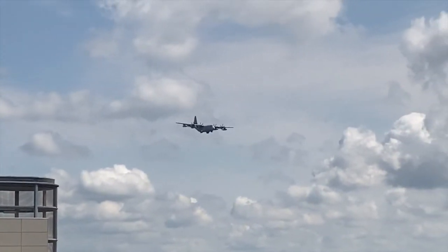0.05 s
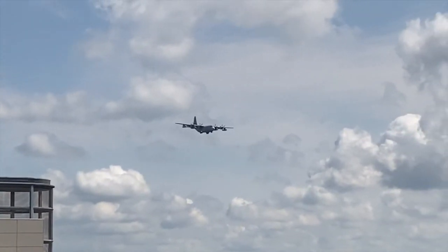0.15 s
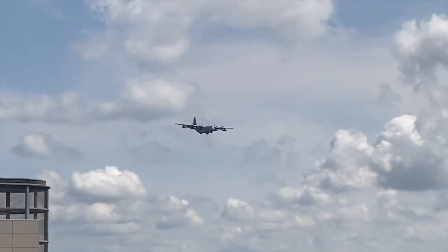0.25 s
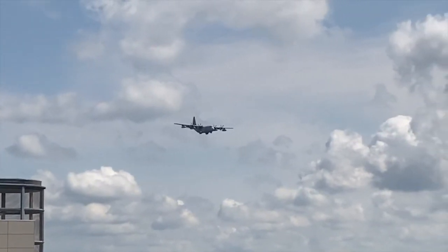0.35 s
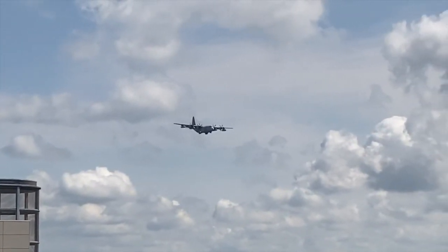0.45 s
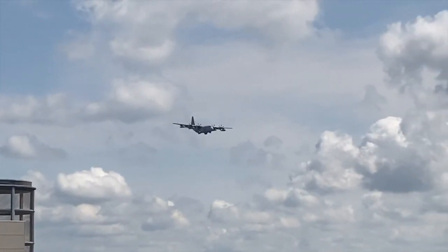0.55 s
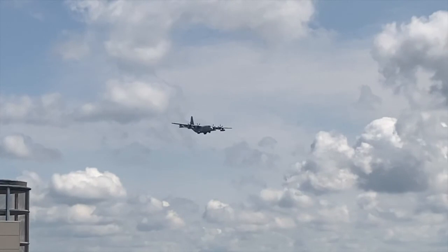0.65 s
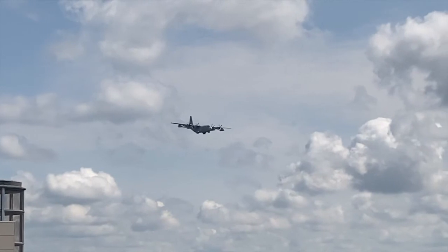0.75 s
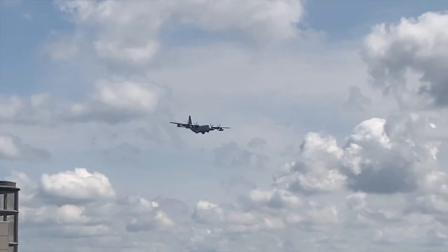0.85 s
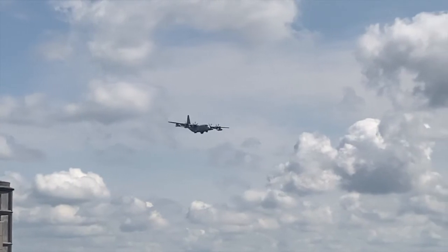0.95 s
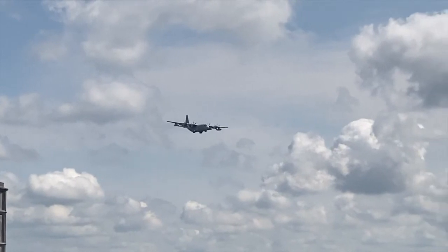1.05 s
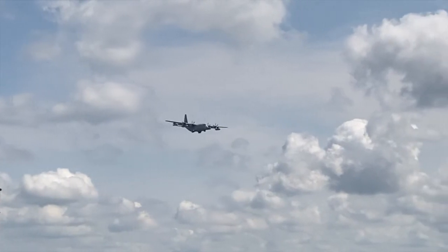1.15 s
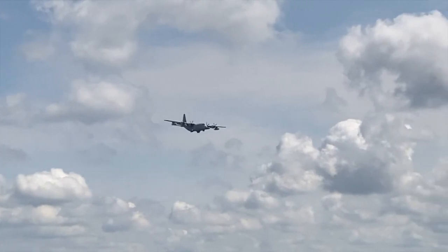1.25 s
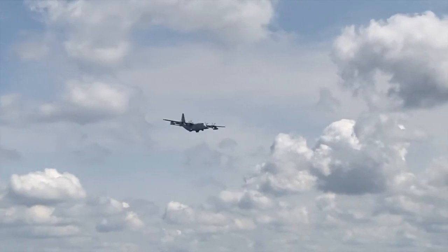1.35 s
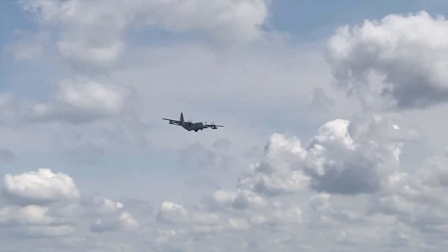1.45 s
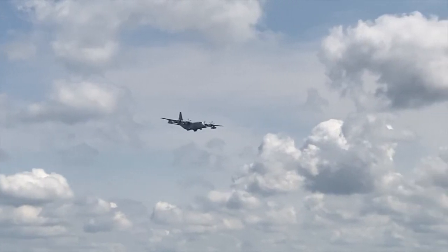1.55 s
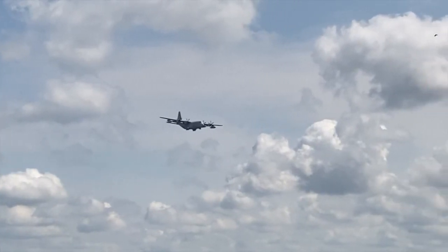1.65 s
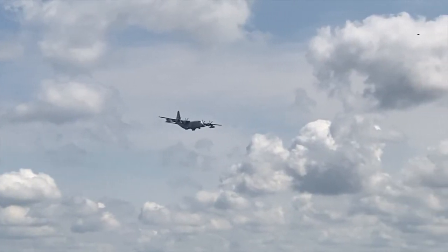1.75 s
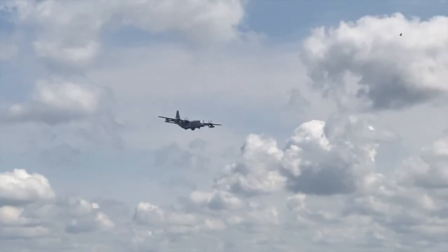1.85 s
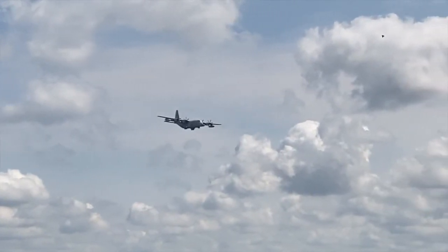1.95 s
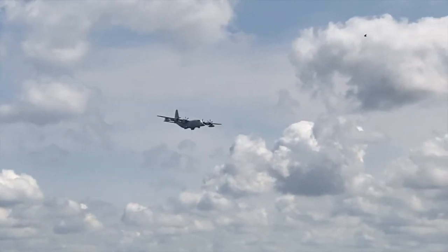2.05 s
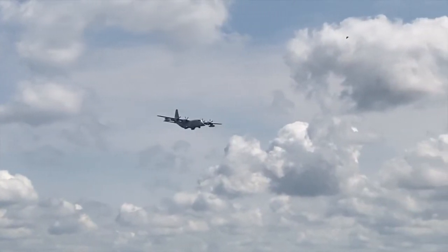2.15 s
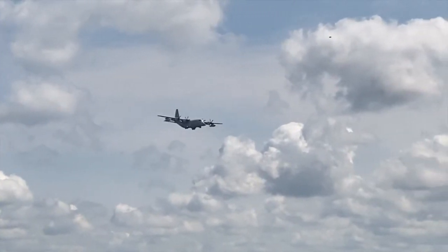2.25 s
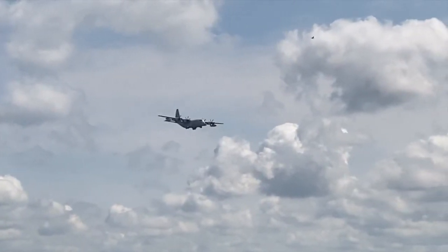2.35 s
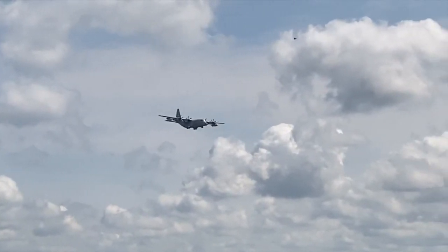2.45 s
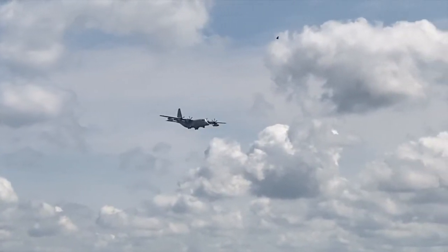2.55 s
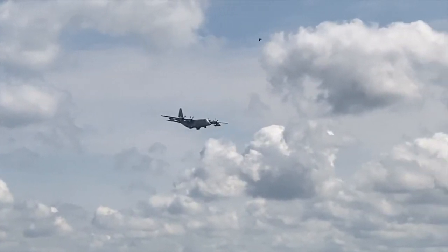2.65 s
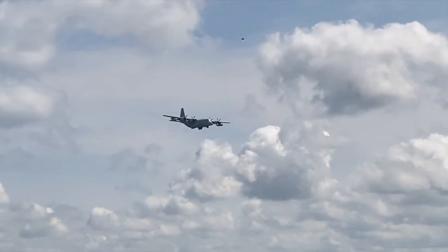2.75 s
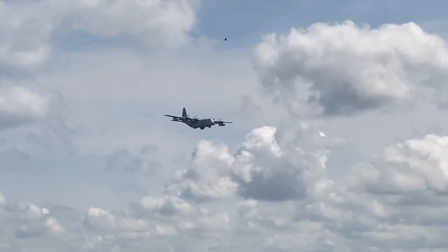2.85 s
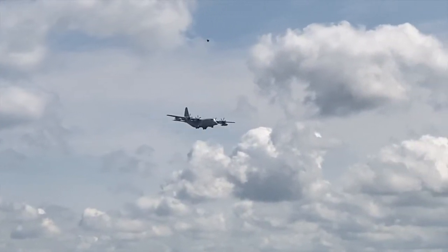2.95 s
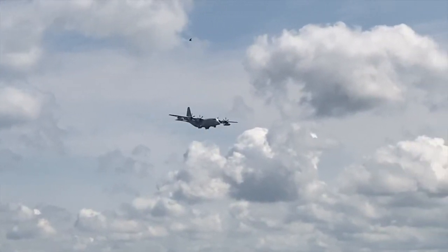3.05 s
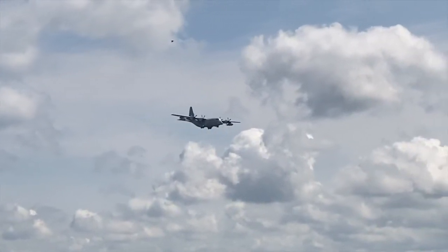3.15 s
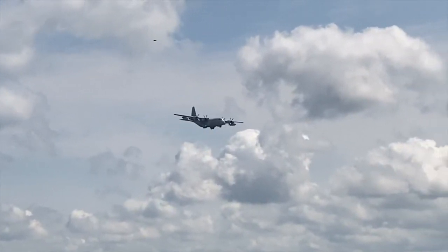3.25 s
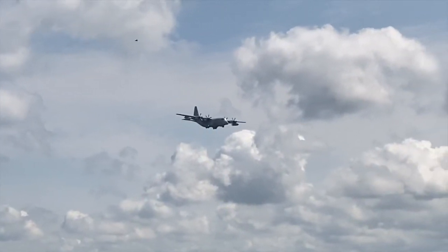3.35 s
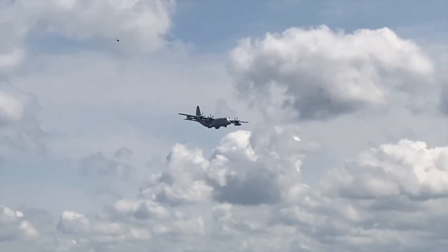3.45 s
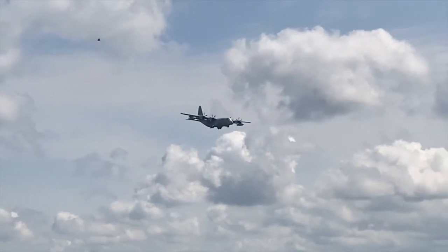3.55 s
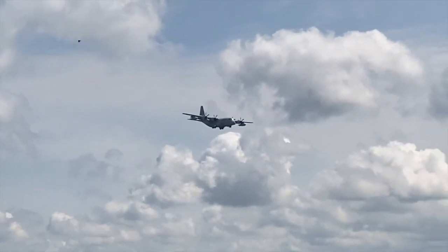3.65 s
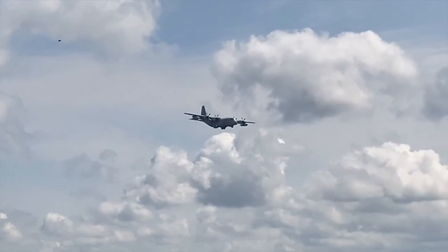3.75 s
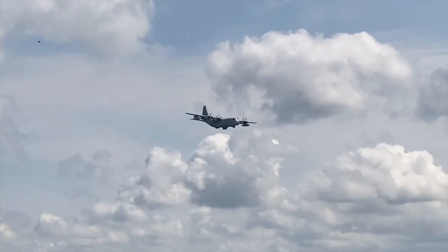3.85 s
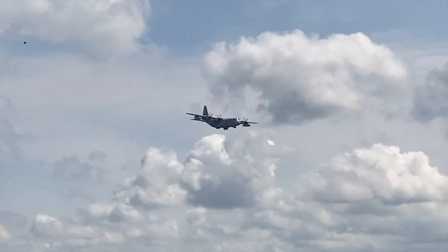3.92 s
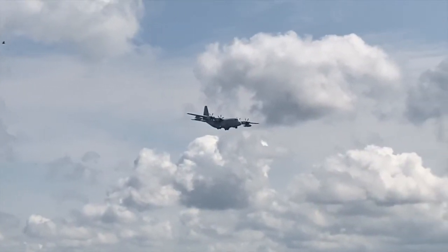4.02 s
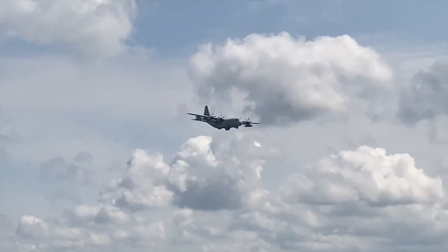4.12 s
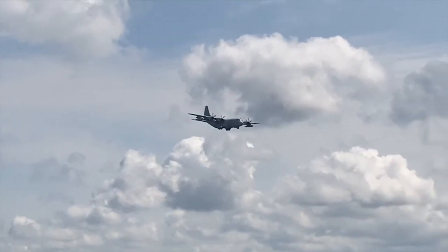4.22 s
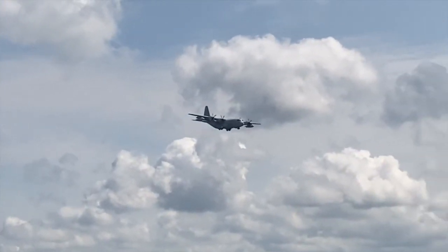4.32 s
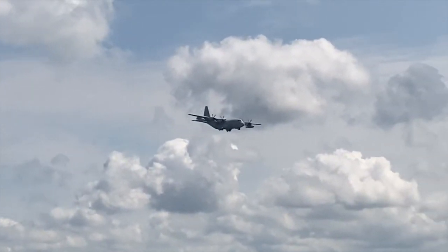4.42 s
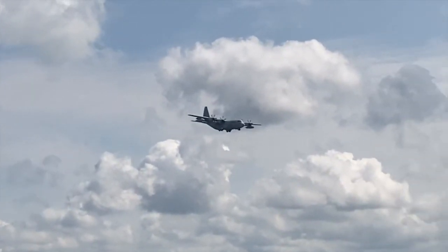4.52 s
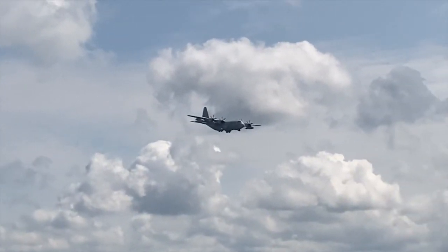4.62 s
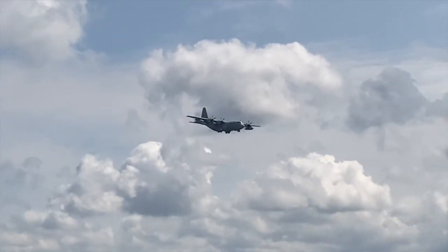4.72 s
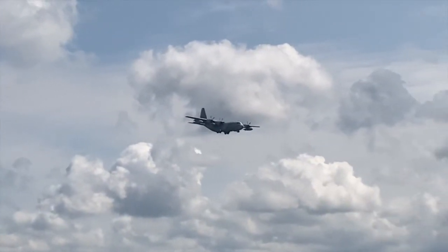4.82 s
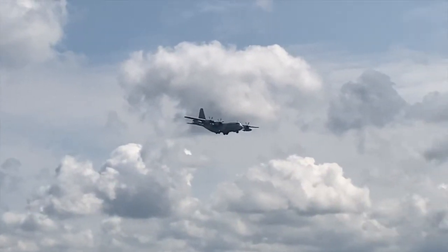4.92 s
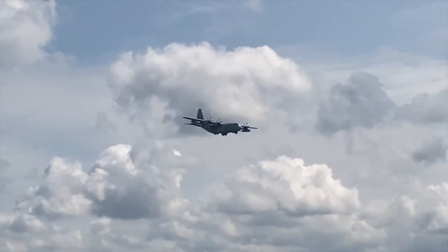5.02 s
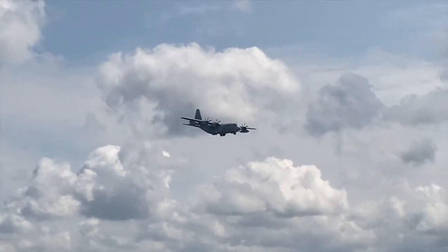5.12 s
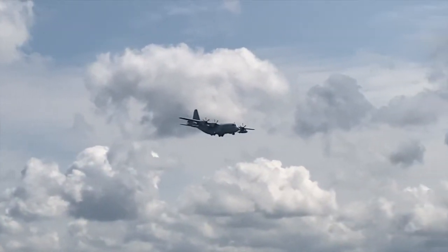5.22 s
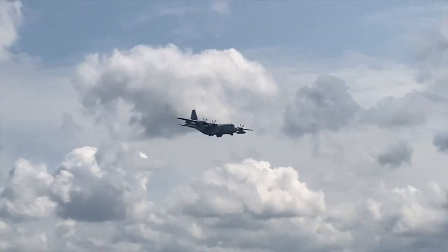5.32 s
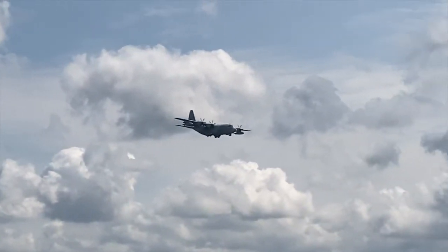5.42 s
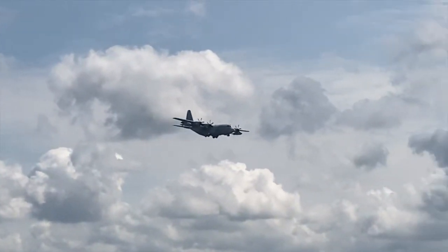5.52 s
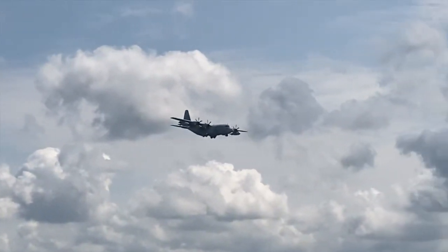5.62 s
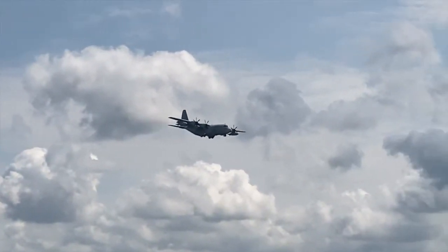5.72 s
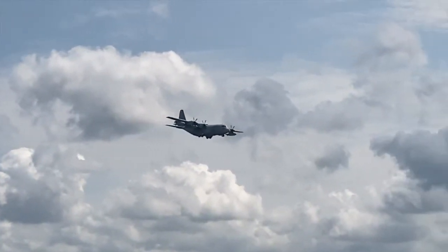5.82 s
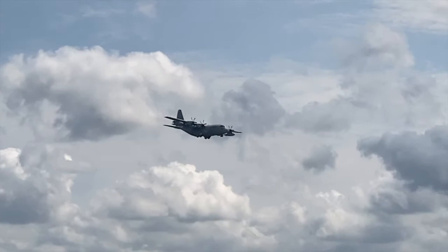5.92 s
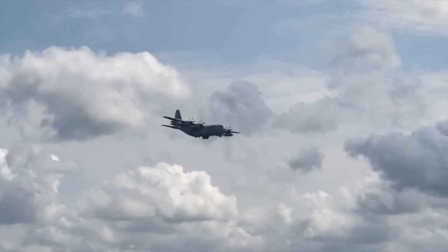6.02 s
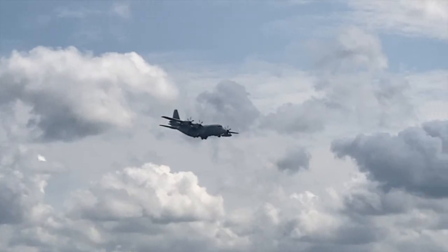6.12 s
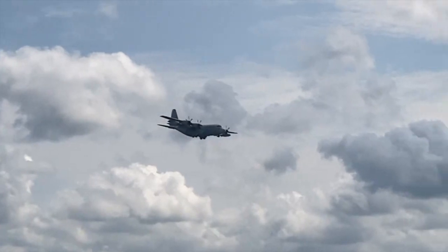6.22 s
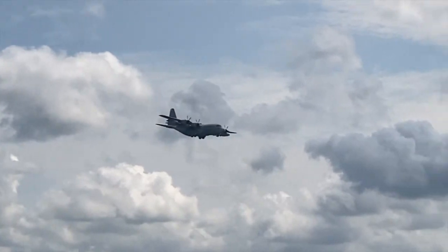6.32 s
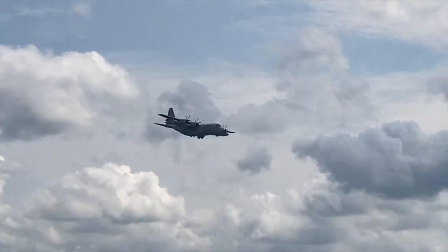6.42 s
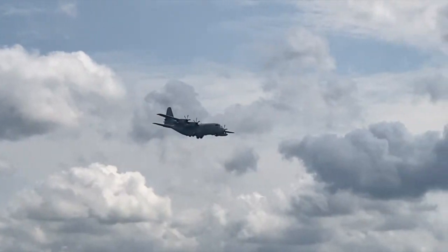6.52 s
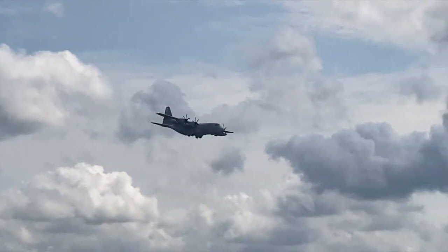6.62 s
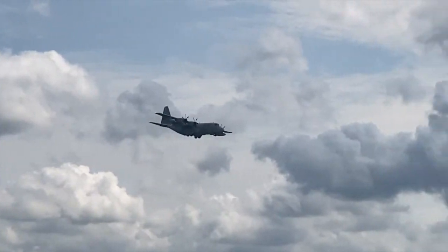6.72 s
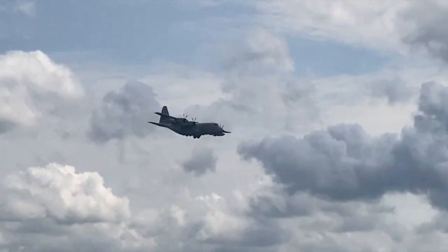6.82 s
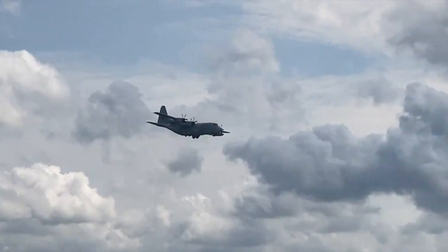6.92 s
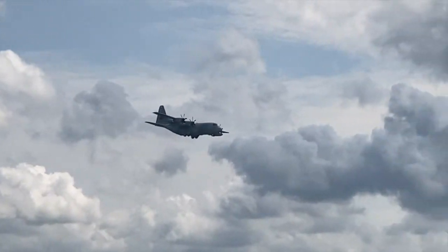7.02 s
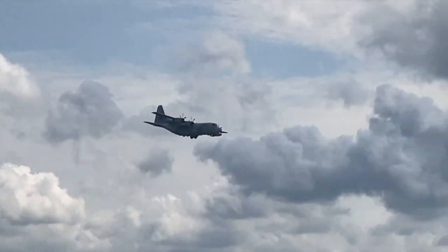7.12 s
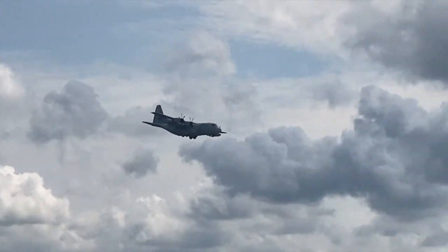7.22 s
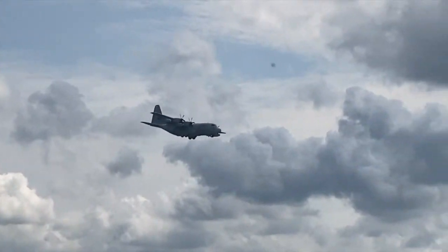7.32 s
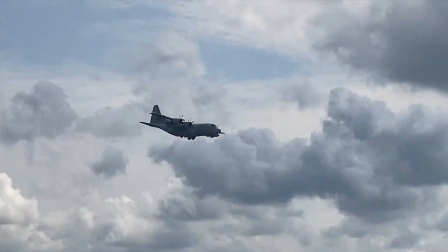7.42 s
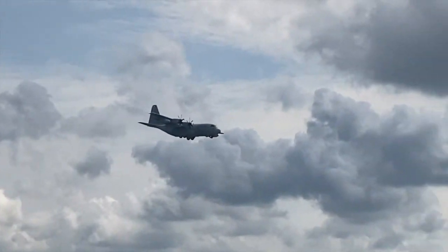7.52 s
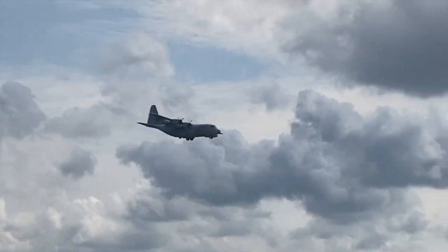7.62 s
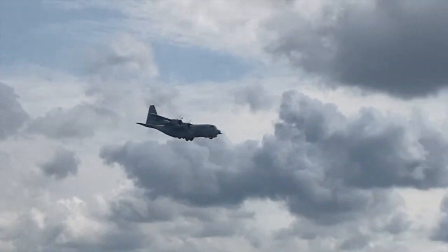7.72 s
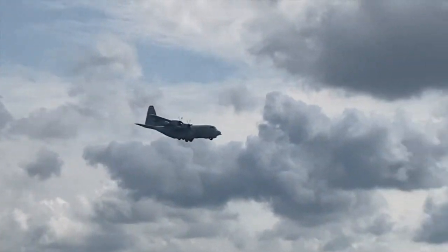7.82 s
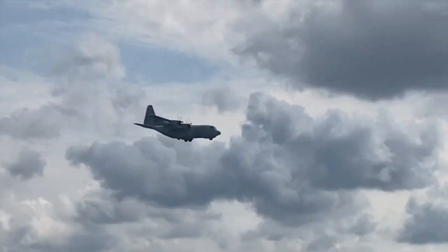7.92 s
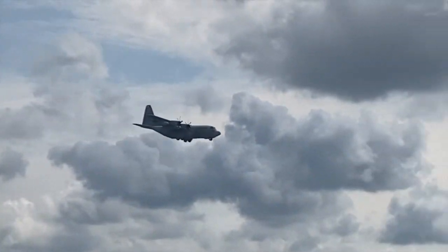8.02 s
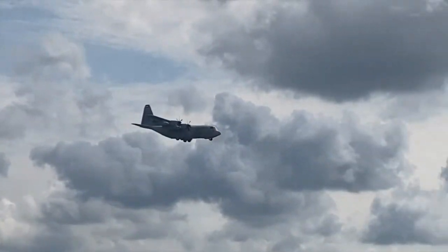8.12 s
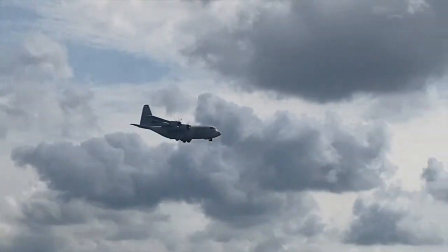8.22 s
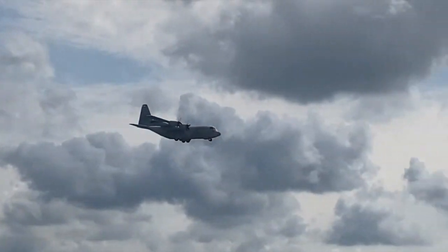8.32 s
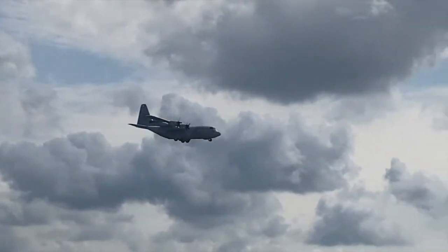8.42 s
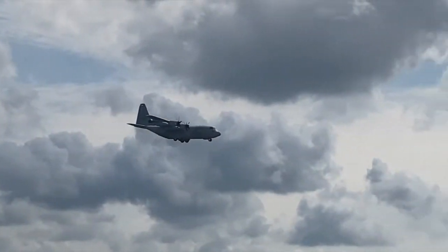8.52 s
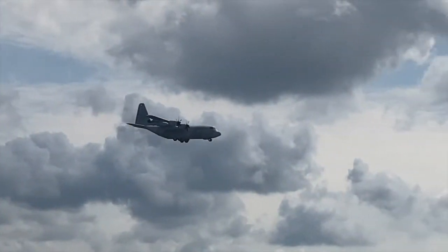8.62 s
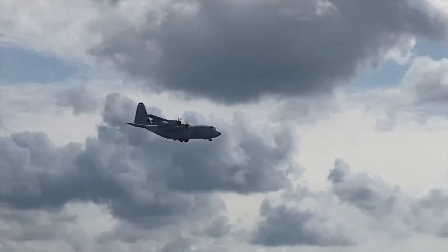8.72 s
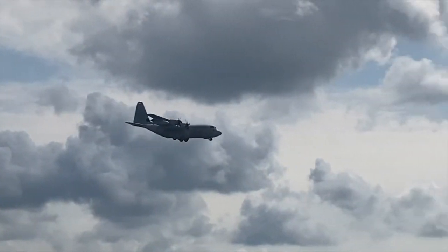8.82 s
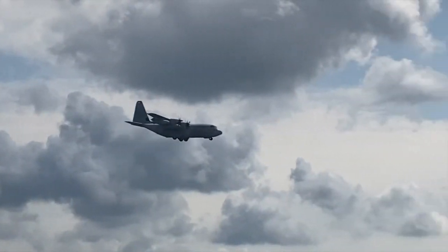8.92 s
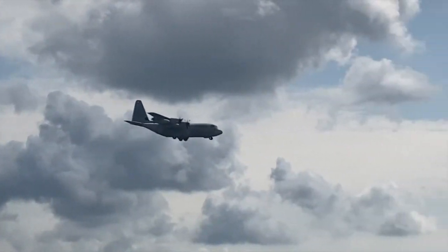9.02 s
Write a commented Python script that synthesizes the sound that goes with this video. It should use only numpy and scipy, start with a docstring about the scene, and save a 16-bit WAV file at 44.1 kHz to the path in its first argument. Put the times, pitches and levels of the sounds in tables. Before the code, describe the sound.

Wavering low-pitched roar of a heavy turboprop flying nearer, with faint high turbine whine, then a strong throbbing blade hum emerging over the rumble.

```python
"""A four-engine turboprop comes in low over open ground, heard at two close microphone ports.
From the start its roar, noise shaped by pitch, swells in gusty air, combed by a nearby surface, while
narrow noise makes a high compressor whine and its whistles; a low hum of narrow noise lies below.
Later the blade tone, a few sines with growling noise, rises out of the roar and sinks in pitch.
Faint hiss and a faint mirror of the sound in the treble lie over it all."""
import sys
import numpy as np
from scipy import signal
from scipy.fft import rfft, irfft, next_fast_len
from scipy.io import wavfile
from scipy.ndimage import uniform_filter1d, map_coordinates

SR = 44100
rng = np.random.default_rng(int(sys.argv[2]) if len(sys.argv) > 2 else 0)


def voltage_ratio(decibels):
    """Convert decibels (scalar or array-like) to amplitude ratios, 20 dB per decade."""
    exponent = np.asarray(decibels, float) / 20
    return 10 ** exponent


def transcribe(signal):
    """Save signal, clipped to [-1, 1], as a 16-bit WAV file at the path in sys.argv[1]."""
    frames = np.atleast_2d(signal).T
    limited = np.clip(frames, -1, 1)
    pcm = np.round(limited * 32767).astype(np.int16)
    wavfile.write(sys.argv[1], SR, pcm)


N = 399546   # length in samples

# middle of the compressor whine: (time [s], pitch [Hz])
WHINE_PITCH = [(0, 6780), (3, 6660), (5.5, 6520), (6.6, 6580), (7.4, 6730), (8.2, 6680), (9.06, 6640)]
# whine as the intakes turn, at mean distance and swell:
# (time [s], level of the shared part [dB], width [Hz], left over right [dB])
WHINE_SHAPE = [(0, -81, 260, -3), (1.5, -71, 260, 5), (3, -70.5, 280, 0), (4.5, -69, 300, 1),
               (6, -71, 320, 3.5), (6.9, -71, 350, 7), (7.5, -69.5, 480, 4.5), (8.1, -68, 520, 5.5),
               (8.3, -73.5, 520, 6), (8.5, -70, 560, 3), (8.8, -75, 520, 9), (9.06, -76, 500, 7)]
# whistles of single compressors: (start [s], end [s], start pitch [Hz], end pitch [Hz], level over whine [dB])
WHISTLES = [(0, 6.1, 6790, 6500, -3), (1.7, 4.2, 6330, 6230, -8), (6.1, 6.9, 6630, 6660, -5),
            (6.0, 6.9, 6510, 6540, -5), (7.35, 8.3, 6760, 6660, -4), (7.4, 8.6, 6280, 6170, -9),
            (7.9, 8.2, 5990, 5950, -6), (8.6, 9.06, 6600, 6520, -5), (.9, 3.3, 4940, 4930, 2)]
# wavering low hum: (time [s], pitch [Hz], level [dB])
HUM = [(2.5, 94, -50), (3.3, 94, -43), (4.3, 93, -44), (5.7, 92, -41), (7, 92, -42), (8, 90, -48),
       (9.06, 88, -54)]
# blade tone, growing as the propeller discs turn edge-on: (time [s], level [dB])
BLADE_TONE = [(3.6, -60), (4.2, -43), (4.6, -39), (5.1, -41), (5.25, -33), (5.55, -33), (5.65, -40),
              (5.85, -33), (6.05, -43), (6.3, -36), (6.6, -44), (6.66, -29), (6.9, -27), (6.95, -45),
              (7.0, -28), (7.1, -31), (7.2, -26.5), (7.56, -21), (7.86, -24), (8.34, -18), (8.42, -19.5),
              (8.5, -17), (8.66, -20), (8.8, -19.5), (9.06, -23)]
# its overtones: (time [s], second multiple [dB], third multiple [dB])
OVERTONES = [(6.5, -55, -60), (7.35, -46, -52), (7.45, -33, -46), (7.7, -33, -45), (7.85, -36, -46),
             (8.0, -34, -45), (8.3, -33, -43), (8.45, -36, -42), (8.65, -40, -43), (8.8, -32, -43),
             (9.06, -32, -46)]
# colour given to the roar, without its comb and cut off above about 8.3 kHz; only the shape counts:
# (pitch [Hz], level [dB per Hz])
ROAR_COLOUR = [(20, -33.5), (35, -15.5), (55, -1.5), (100, -1.5), (230, 1.5), (410, -6), (520, -12.5),
               (720, -9), (1100, -14.5), (1450, -14.5), (1900, -17.5), (2450, -16), (2800, -16),
               (3300, -23), (4500, -36.5), (5600, -43), (6200, -43), (6900, -64), (7200, -70.5),
               (8250, -80), (8500, -100)]
# how far the left port leads, aircraft far and ahead, then near and aside: (pitch [Hz], lead [radians])
LEAD_FAR = [(0, 0), (1400, .1), (2100, .8), (2600, 1.7), (3400, 2.4), (4200, 2.7), (4700, 1.4), (6200, 2.4),
            (6900, 0), (7600, 0), (8400, -2.8)]
LEAD_NEAR = [(0, 0), (800, .3), (1400, .2), (2100, 1.4), (2400, 2.1), (2900, 3.1), (3300, 3), (6200, 3),
             (6700, 0), (7500, -.8), (8400, -2.8)]
# the bearing swings between these times: (start [s], end [s])
BEARING_SWING_S = (5.5, 7.6)
# scattered sound, unrelated at the two ports, against the direct roar:
# (pitch [Hz], level when far [dB], level when near [dB])
SCATTER = [(30, -10, -8.5), (200, -19, -25), (624, -6.5, -6.5), (2500, -6, -8), (3330, -6.5, -5),
           (3990, 2, 0.5), (4620, 3, -3), (5200, -2, -5.5), (6100, -2.5, -4.5), (7000, -8.5, -8),
           (8000, -1.5, -4)]
# balance of the roar: (pitch [Hz], left over right [dB])
BALANCE = [(60, -.3), (400, .6), (820, -.4), (1200, .8), (2500, -1.5), (3300, 0), (4500, 2.6), (7000, 1)]
# reflection off a nearby surface: (time [s], delay [ms], level [dB])
ECHO = [(0, 1.235, -7), (3, 1.235, -7), (5, 1.245, -7.5), (6.5, 1.25, -8), (7.4, 1.30, -7),
        (9.06, 1.30, -7)]
# faint later paths off ground and buildings: (delay [ms], level [dB])
LATER_PATHS = [(2.6, -18), (3.7, -19), (5.1, -19), (6.4, -19), (8.2, -19), (10.1, -20), (12.6, -20),
               (17.3, -21)]
# gusty air lets the roar through in swells, counted from the mean level:
# (time [s], level [dB], tilt toward the treble [dB per octave])
SWELL = [(0, -38, -1.5), (.3, -37.5, 3.5), (.7, -40.5, 2), (1.2, -42, 0), (1.55, -40.5, 0.8), (1.9, -44, 2),
         (2.3, -41.5, 1.5), (2.5, -39, -0.5), (2.75, -42.5, 0.5), (3.1, -39, 0), (3.4, -40, 0),
         (3.65, -38, 0.5), (3.85, -34.5, -0.7), (4.1, -37.5, -2.5), (4.3, -41, 0), (4.6, -37, -1),
         (4.85, -35, -1), (5.1, -38, -1.5), (5.35, -39, -2), (5.7, -40, 0.9), (6.1, -40.5, -0.5),
         (6.5, -36, -1.7), (6.85, -42, -0.3), (7.0, -44, -1.2), (7.2, -45, 1.5), (7.35, -38.5, -0.5),
         (7.45, -34, 0.9), (7.62, -32, 0), (7.72, -39.5, 1.2), (7.85, -39.5, -.3), (8.05, -36.5, 0),
         (8.3, -43, 0.5), (8.55, -40.5, 1.5), (8.7, -41.5, 0.5), (8.85, -36, -2.2), (9.06, -41.5, 0)]
# the rumble heaves on its own, counted from its mean: (time [s], level [dB])
RUMBLE = [(0, -33), (.55, -32), (.9, -35.5), (1.3, -31), (1.7, -30.5), (2.1, -28.5), (2.5, -33),
          (3.1, -33.5), (3.6, -36.5), (3.9, -33), (4.9, -32), (5.4, -31.5), (5.75, -28), (6.1, -33),
          (7.2, -33), (7.6, -31), (8.2, -31), (8.55, -25.5), (8.8, -31), (9.06, -35)]
# how far each pitch follows them: (pitch [Hz], share of rumble, share of swell, swell late by [ms])
FOLLOWS = [(70, 0.067, 0, 154.5), (140, 0.73, 0.0, 154.5), (400, 0.82, 0.078, 151), (573, 0.6, 0.26, 58.5),
           (990, 0.58, 0.58, 65.5), (1800, 0.078, 0.9, -2), (2570, 0.2, 1, -24.5), (4500, 0.19, 0.52, 6),
           (7500, 0.17, 0.89, 16.5)]
# loss with distance; above 7 kHz set so that the far roar all but vanishes:
# (pitch [Hz], loss [dB per 100 m])
DISTANCE_LOSS = [(35, 2.0), (70, 0), (300, -0.5), (580, 0.92), (1000, -0.1), (2600, 0.76), (3300, 1.7),
                 (4500, 3), (6000, 7), (7000, 4.5), (7600, 16.5)]

# straight flight past the listener; six blades a propeller; blade pitch before the Doppler shift
SPEED_M_PER_S, PASS_M, ABEAM_S, SOUND_M_PER_S, BLADE_HZ = 62, 267, 10.73, 343, 102.25
ROAR_DB = -38.5   # middle pitches, at mean distance and swell
TILT_ABOUT_HZ = 1600   # the swell's tilt leaves this pitch alone
# phase turn in cycles; lost in the treble; too small a surface to return the bass
ECHO_TURN, ECHO_FADE_HZ, ECHO_THIN_HZ = 0.8, 5200, 500
ECHO_WANDER_MS, ECHO_WAVER_DB = 0.015, 1.0   # the hand sways; the reflection comes and goes
IMAGE_HZ, IMAGE_DB = 11014, -60   # pitch and depth of the ripple that makes the mirror
SELF_NOISE_DB = -92.5   # hiss of the microphone


def roar(patchy_db, gust_db, gusty_above_hz):
    """Band by band: gusts swell it, the treble clears as the path shortens, turbulence makes patches."""
    size = next_fast_len(N)
    hz = np.fft.rfftfreq(size, 1 / SR)
    spectrum = at_ports(size, hz)
    # the middle pitches, averaged over both ports, are brought to rms 1
    middle_band = (hz > 750) & (hz < 1400)
    middle = np.sum(np.abs(spectrum[:, middle_band].mean(axis=0)) ** 2)
    spectrum /= np.sqrt(2 * middle) / size
    centres = 40 * 2 ** np.arange(0, 8, 1 / 3)   # third-octave bands that overlap
    place = np.interp(np.log(hz + 1), np.log(centres), np.arange(len(centres)))
    out, gust, air_db = np.zeros((2, N)), drift(8.0), air()
    for k, centre in enumerate(centres):
        band = irfft(spectrum * np.clip(1 - np.abs(place - k), 0, 1), size)[:, :N]
        patches = drift(0.63) + 0.68 * (centre > 2800) * drift(11.0)
        shared_gust_db = gust_db * (centre > gusty_above_hz) * gust
        out += band * voltage_ratio(ROAR_DB + air_db(centre) + patchy_db * patches + shared_gust_db)
    return out


def at_ports(size, hz):
    """Steady noise as the two ports hear it: direct path, its reflections and scattered sound."""
    white = rfft(rng.standard_normal((3, size)))
    direct = white[0] + rfft(surface_echo(white[0], size, hz))   # evenly spaced notches
    direct = rfft(later_paths(irfft(direct, size), rate_hz=1.8))
    far, near = (irfft(direct * np.exp(-1j * at_hz(lead, hz)), size) for lead in (LEAD_FAR, LEAD_NEAR))
    swing = np.interp(np.arange(size) / SR, BEARING_SWING_S, [0, 1])
    both = np.array([direct, rfft((1 - swing) * far + swing * near)])
    table = np.array(SCATTER)
    far, near = (irfft(white[1:] * voltage_ratio(at_hz(table[:, [0, k]], hz)), size) for k in (1, 2))
    both += rfft((1 - swing) * far + swing * near)
    left_right_db = at_hz(BALANCE, hz) * np.array([[.5], [-.5]])
    return both * voltage_ratio(at_hz(ROAR_COLOUR, hz) + left_right_db)


def surface_echo(spectrum, size, hz):
    """A nearby surface returns a late, phase-turned copy, weak in the bass and in the treble."""
    treble_fade = 1 / (1 + (hz / ECHO_FADE_HZ) ** 6)
    bass_fade = hz ** 2 / (hz ** 2 + ECHO_THIN_HZ ** 2)
    turned = irfft(-spectrum * np.exp(2j * np.pi * ECHO_TURN) * treble_fade * bass_fade, size)
    delay_ms, level_db = in_time(ECHO)
    delay = (delay_ms + ECHO_WANDER_MS * drift(0.31)) * SR / 1000   # in samples
    level_db = level_db + ECHO_WAVER_DB * drift(0.63)
    delay, level_db = (np.pad(v, (0, size - N), "edge") for v in (delay, level_db))
    return voltage_ratio(level_db) * map_coordinates(turned, [np.arange(size) - delay], order=3, mode="wrap")


def later_paths(x, rate_hz):
    """Each faint echo waxes, wanes and flips as the geometry shifts, rippling the spectrum finely."""
    out = x.copy()
    for delay_ms, level_db in LATER_PATHS:
        strength = np.pad(drift(rate_hz), (0, len(x) - N), "edge")
        out += voltage_ratio(level_db) * strength * np.roll(x, round(delay_ms * SR / 1000))
    return out


def propellers(waver, flutter_db, lead, right_db):
    """The blade rate and its multiples as sines, shaken by the air, the higher ones more."""
    # waver and lead in radians; the left port leads
    phase = turns(BLADE_HZ * flight()[1]) + waver * drift(4.7) + np.array([[lead], [0]])
    tone = 0
    for k, db in enumerate(in_time(BLADE_TONE) + in_time(OVERTONES)):
        flutter = flutter_db * (0.6 * k + 0.05) * drift(11.0)
        tone = tone + np.sqrt(2) * voltage_ratio(db + flutter) * np.cos((k + 1) * phase)
    return tone * voltage_ratio([[-right_db / 2], [right_db / 2]])


def growl(width_hz, under_db):
    """Uneven air through four discs smears the second and third multiples into rough bands."""
    hz, (tone_db,) = BLADE_HZ * flight()[1], in_time(BLADE_TONE)
    tone_db = uniform_filter1d(tone_db, size=SR // 3)   # follows the blade tone smoothly
    bands = 0
    for multiple, db in enumerate(under_db, start=2):
        bands = bands + voltage_ratio(db) * narrow_noise(multiple * hz, multiple * width_hz)
    return voltage_ratio(tone_db) * bands


def whine(whistle_hz, apart_db):
    """Four compressors blur into a hissy band; single ones stand out as whistles, mostly on the left."""
    (hz,), (db, width_hz, left_db) = in_time(WHINE_PITCH), in_time(WHINE_SHAPE)
    t = np.arange(N) / SR
    tight, loose = width_hz.min(), width_hz.max()
    wide = (width_hz - tight) / (loose - tight)
    blur = []
    for _ in range(3):   # one shared by both ports, then one for each
        narrow, broad = narrow_noise(hz, tight), narrow_noise(hz, loose)
        blur.append(np.sqrt(1 - wide) * narrow + np.sqrt(wide) * broad)
    out = blur[0] + voltage_ratio(apart_db) * np.array(blur[1:])
    for start, end, from_hz, to_hz, whistle_db in WHISTLES:
        fade = np.clip(np.minimum(t - start, end - t) / .2, 0, 1)
        whistle = narrow_noise(np.interp(t, [start, end], [from_hz, to_hz]), whistle_hz)
        out += voltage_ratio(whistle_db) * fade * whistle * [[1], [.2]]
    left_right_db = left_db * np.array([[.5], [-.5]])
    return voltage_ratio(db + air()(hz.mean()) + 1.0 * drift(18.0) + left_right_db) * out


def hum():
    """An unsteady low tone made of very narrow noise."""
    hz, db = in_time(HUM)
    return voltage_ratio(db) * narrow_noise(hz, 8.0)


def air():
    """Returns the gain in dB over time that gusts and distance give a pitch."""
    (rumble,), (swell, tilt), path = in_time(RUMBLE), in_time(SWELL), flight()[0]
    rumble, swell, path = (v - v.mean() for v in (rumble, swell, path))
    table, t = np.array(FOLLOWS), np.arange(N) / SR

    def gain_db(hz):
        """Rumble, delayed swell and loss with distance at one pitch."""
        low, high, late_ms = (at_hz(table[:, [0, k]], hz) for k in (1, 2, 3))
        late_swell = np.interp(t - late_ms / 1000, t, swell)
        tilted_swell = late_swell + tilt * np.log2(hz / TILT_ABOUT_HZ)
        return low * rumble + high * tilted_swell - at_hz(DISTANCE_LOSS, hz) * path / 100
    return gain_db


def flight():
    """Distance (m) the sound now arriving has travelled, and its Doppler factor."""
    t, path = np.arange(N) / SR, 0
    for _ in range(6):   # the sound left earlier, so home in on where it left
        ahead = SPEED_M_PER_S * (ABEAM_S - t + path / SOUND_M_PER_S)
        path = np.hypot(ahead, PASS_M)
    return path, 1 / (1 - SPEED_M_PER_S * ahead / path / SOUND_M_PER_S)


def narrow_noise(hz, width_hz):
    """Noise in a narrow band that glides with hz; rms 1."""
    edge = signal.butter(2, width_hz / 2, fs=SR, output="sos")
    cosine, sine = signal.sosfilt(edge, rng.standard_normal((2, N + SR)))[:, SR:]
    return rms_one(cosine * np.cos(turns(hz)) + sine * np.sin(turns(hz)))


def drift(rate_hz):
    """Slow chance of rms 1: noise twice through a one-pole low-pass, one value per 40 samples."""
    r = np.exp(-80 * np.pi * rate_hz / SR)
    slow = signal.lfilter([1], [1, -2 * r, r * r], rng.standard_normal(N // 40 + 2002))[2000:]
    return np.interp(np.arange(N) / 40, np.arange(len(slow)), rms_one(slow))


def turns(hz):
    """Running phase, in radians, of a gliding pitch."""
    return 2 * np.pi * np.cumsum(hz) / SR


def rms_one(x):
    """Scales to unit rms."""
    return x / np.sqrt(np.mean(np.abs(x) ** 2) + 1e-20)


def in_time(rows):
    """Every column of a table after its times, sample by sample."""
    s, *columns = np.transpose(rows)
    return [np.interp(np.arange(N) / SR, s, c) for c in columns]


def at_hz(points, hz):
    """Reads a table by pitch on a log axis."""
    f, value = np.transpose(points)
    return np.interp(np.log(hz + 1), np.log(f + 1), value)


def scene():
    """The aircraft at the two ports: roar, tones and compressors added together."""
    tones = propellers(waver=.18, flutter_db=1.1, lead=0.13, right_db=0.55) + hum()
    tones = tones + growl(width_hz=43, under_db=(-18, -22))
    compressors = whine(whistle_hz=14, apart_db=-7)
    return roar(patchy_db=1.52, gust_db=0.57, gusty_above_hz=320) + tones + compressors


def roll_off(x):
    """The treble ends steeply here."""
    return signal.sosfilt(signal.butter(12, 13000, fs=SR, output="sos"), x)


def record(dry):
    """The microphone adds hiss; a fast ripple in the converter's gain mirrors the sound in the treble."""
    heard = dry + voltage_ratio(SELF_NOISE_DB) * rng.standard_normal((2, N))
    ripple = np.cos(2 * np.pi * IMAGE_HZ * np.arange(N) / SR)
    heard = heard * (1 + voltage_ratio(IMAGE_DB) * ripple)
    return roll_off(heard)


dry = scene()
out = record(dry)
transcribe(out)
```